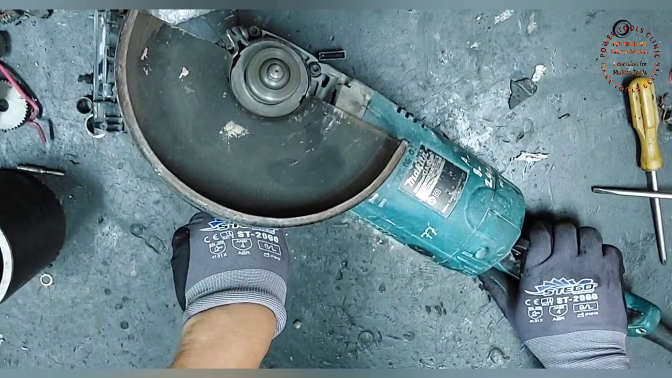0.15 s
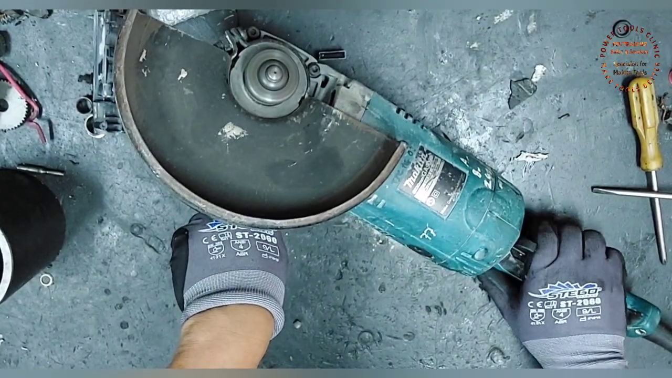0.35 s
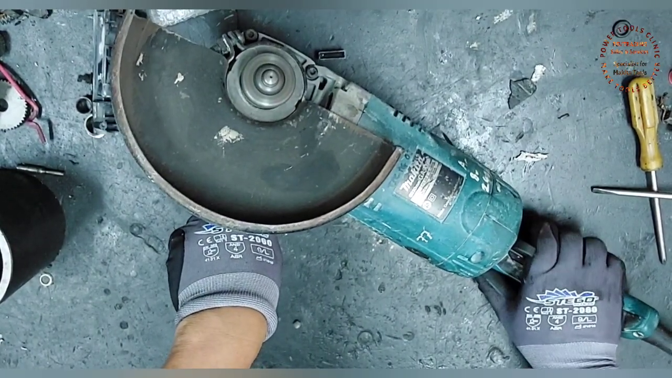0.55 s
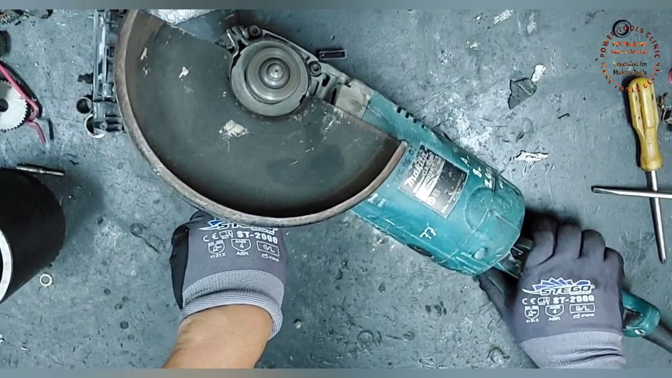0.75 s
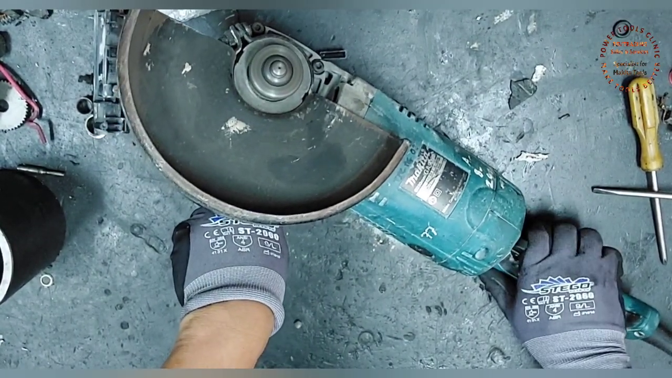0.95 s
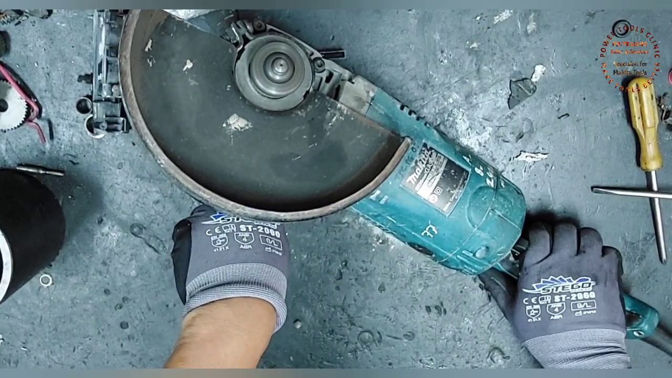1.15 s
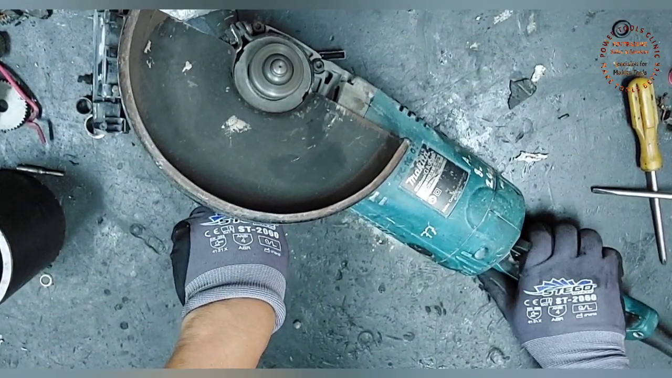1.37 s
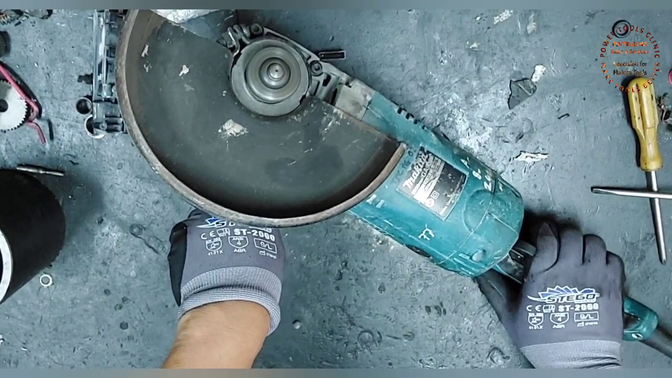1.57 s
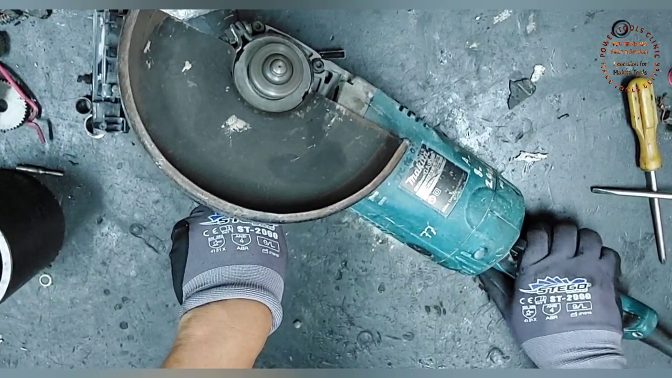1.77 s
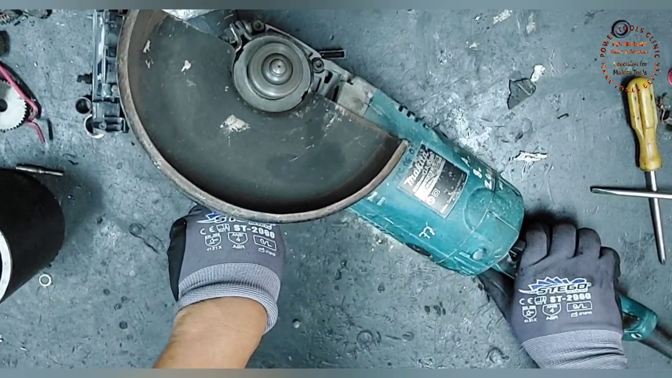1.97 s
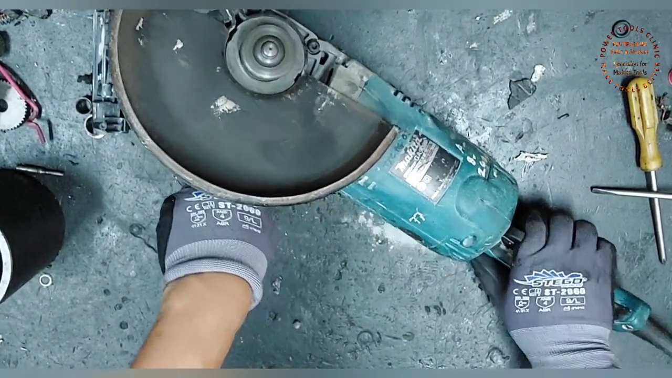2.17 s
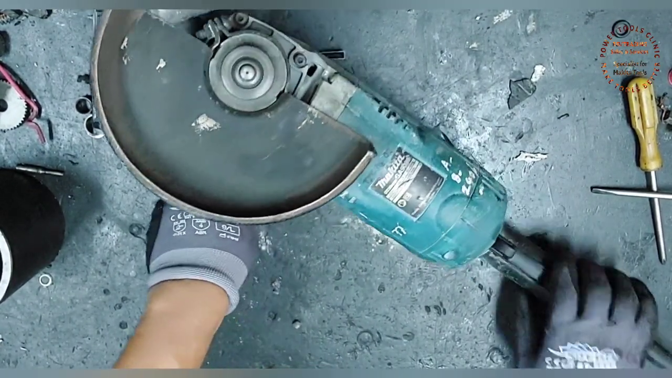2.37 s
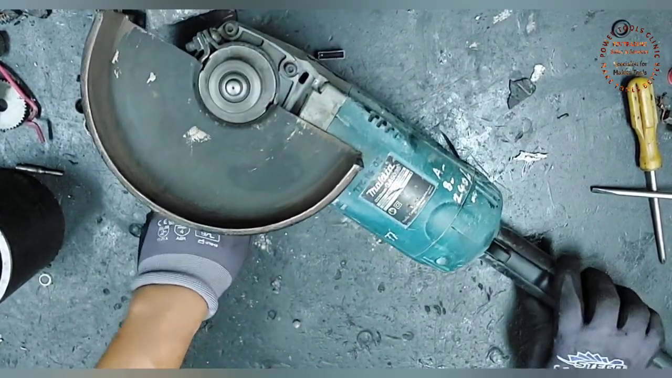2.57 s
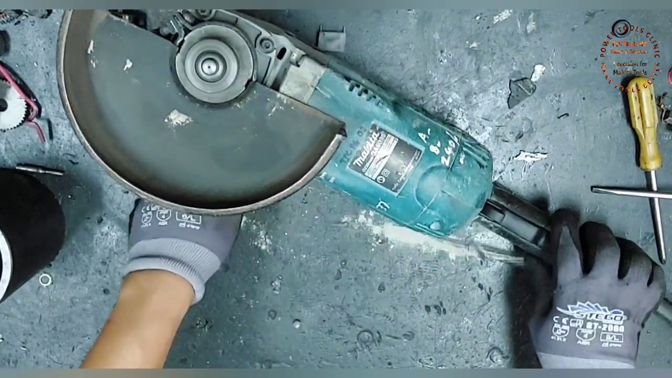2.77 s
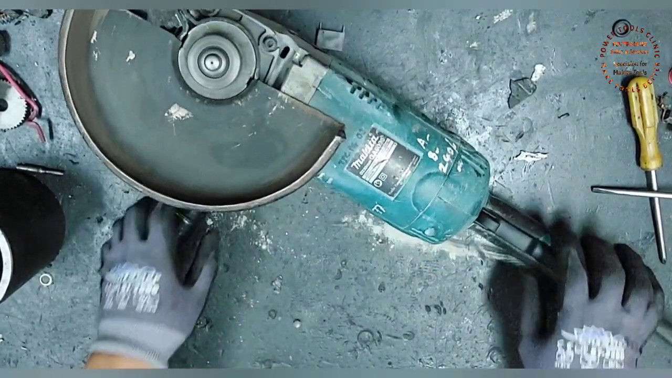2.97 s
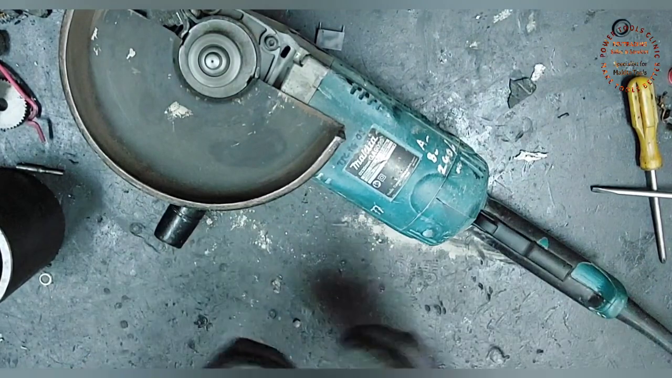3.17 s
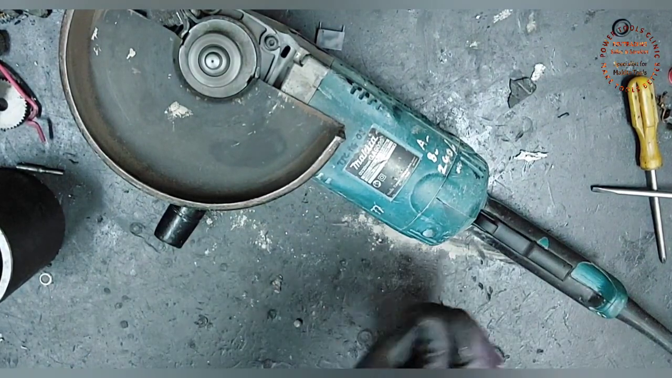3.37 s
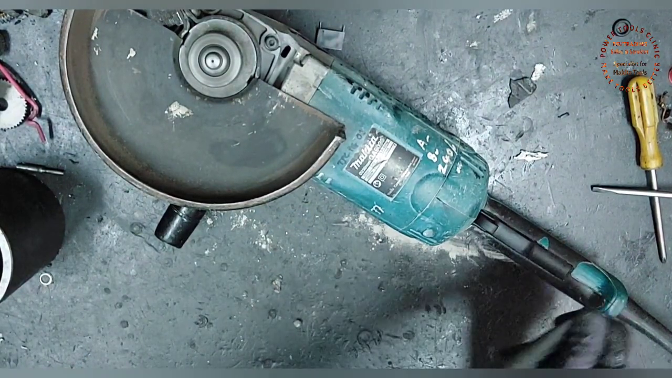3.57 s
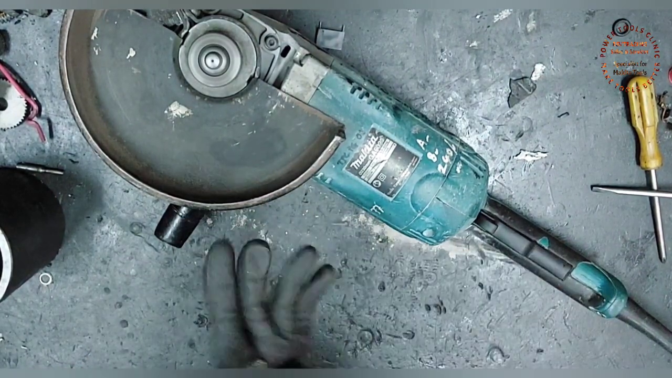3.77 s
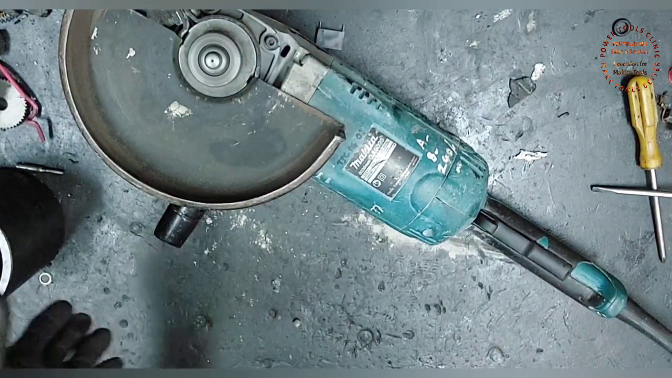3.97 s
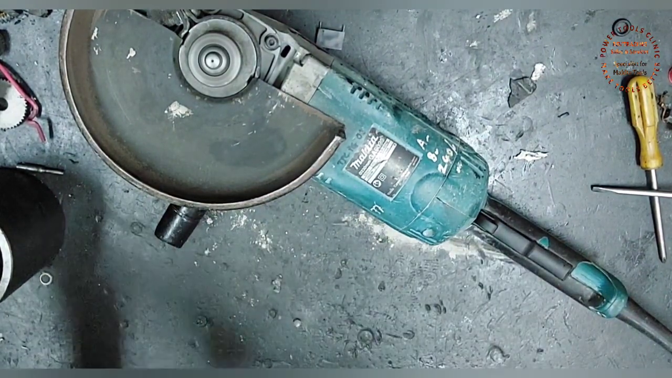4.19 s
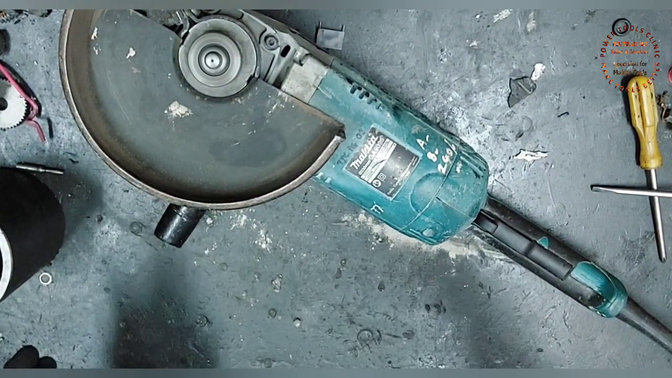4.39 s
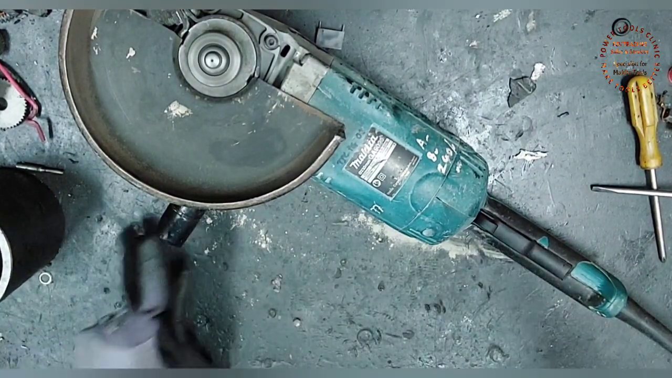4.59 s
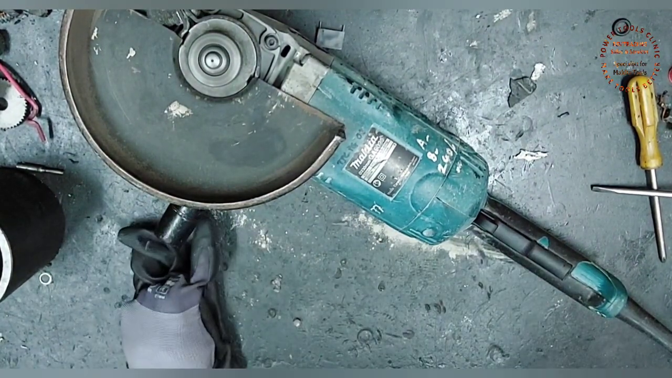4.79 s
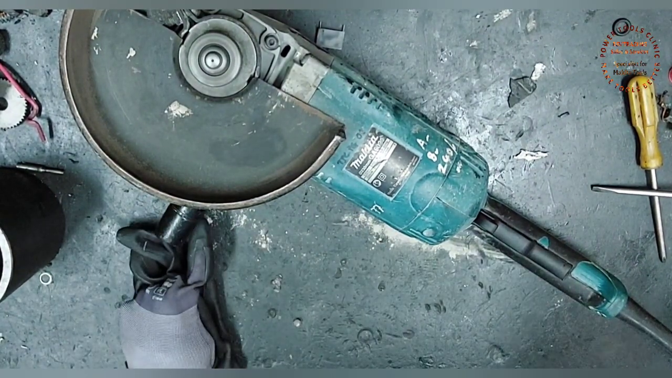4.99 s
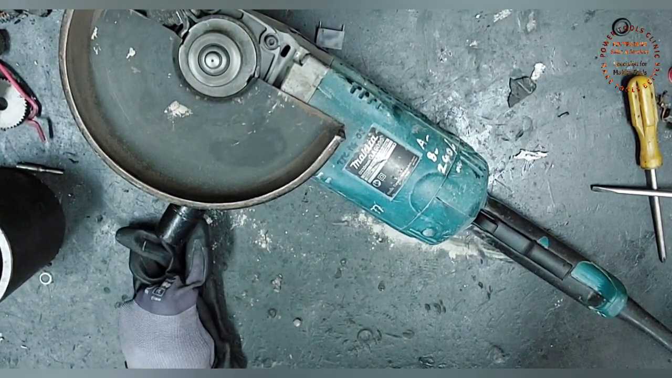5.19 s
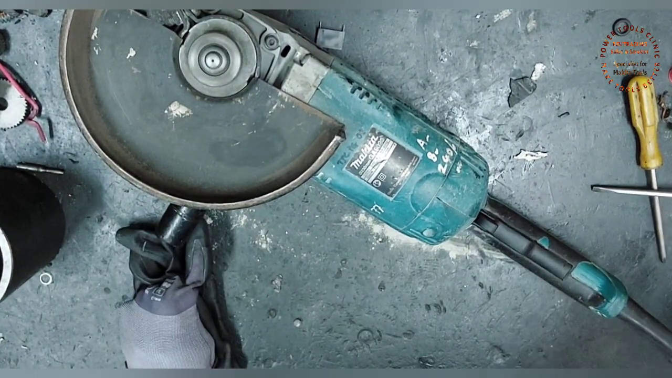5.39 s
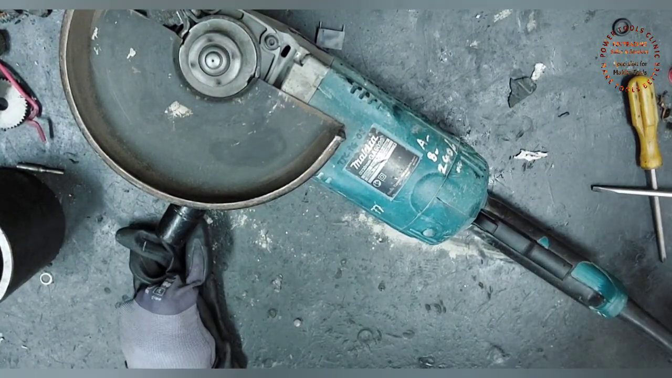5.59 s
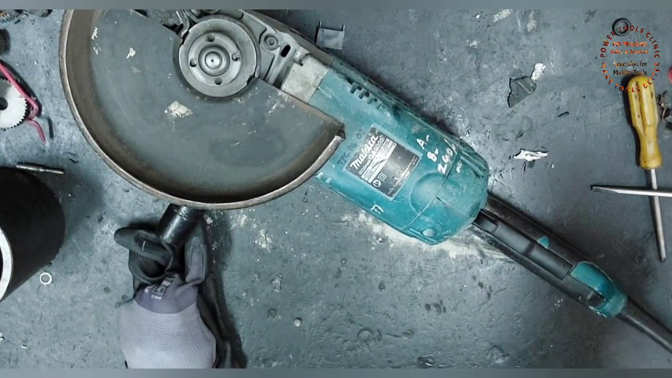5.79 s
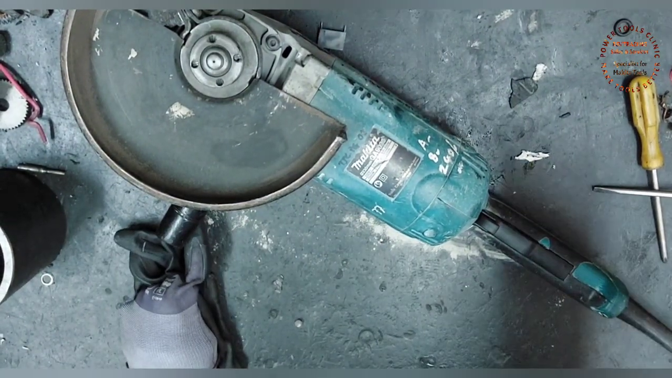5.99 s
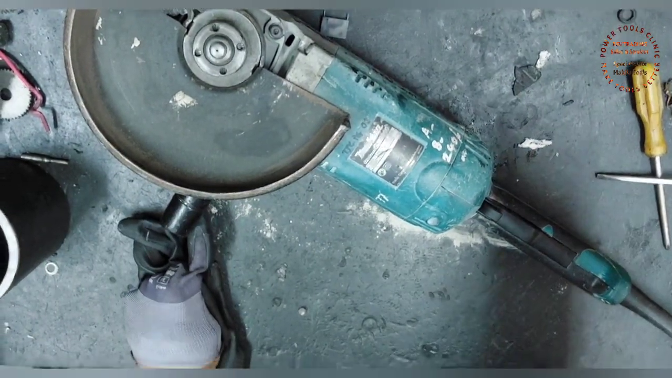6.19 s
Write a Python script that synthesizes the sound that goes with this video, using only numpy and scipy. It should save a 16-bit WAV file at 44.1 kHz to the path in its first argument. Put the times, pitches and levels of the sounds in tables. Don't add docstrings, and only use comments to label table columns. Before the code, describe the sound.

A large angle grinder with no disc is already running, close to a phone in a small-sounding workshop: loud, wide rushing fan air, a buzzing motor body and a thin high singing from the fan blades. At 0.4 s the trigger is released and the pitch sags; it surges back from 0.8 to 1.5 s, sags, and surges again from 1.8 to 2.2 s. Then it coasts. The roar briefly swells hollowly as the tool is lifted around 2.5 s, then thins, while a grainy, many-toned brush whine slides downward, flickering and throbbing. From 3.1 s loose gears clatter irregularly, strongest around 3.2 to 3.7 s, then weaker and sparser. The scraping becomes a low, slow rasp and ends with a small metallic click at 5.8 s. Quiet shop hum remains, with faint glove slides from 6.0 s and soft dull handle bumps from 6.1 to 6.2 s.

```python
import sys
import numpy as np
from scipy import signal
from scipy.fft import rfft, irfft
from scipy.io import wavfile
from scipy.ndimage import uniform_filter1d

SR = 44100
rng = np.random.default_rng(int(sys.argv[2]) if len(sys.argv) > 2 else 0)


def volts_from_decibels(level):
    exponent = np.asarray(level, float) / 20
    return 10 ** exponent


def store_wav(level_fs):
    pcm = np.round(np.clip(np.atleast_2d(level_fs), -1, 1) * 32767)
    wavfile.write(sys.argv[1], SR, pcm.T.astype(np.int16))


N = 275345
T = np.arange(N) / SR
HZ = np.maximum(np.arange(N // 2 + 1) * SR / N, 1)
TOP_HZ = 15700
BARS = 32


# (pressed [s], released [s])
TRIGGER = [
    (0, .405),
    (.813, 1.507),
    (1.815, 2.24),
]


def motor():
    start_turns_s, free_turns_s, spin_up_s = 415.2, 438.5, .263
    friction, bearing_drag, fan_drag = 72.3, .178, .00043
    slip_ease, slip_turns_s = 2.1, 82
    step_s = .001
    t = np.arange(0, T[-1] + step_s, step_s)
    power = 0
    for on, off in TRIGGER:
        power = power + np.clip((t - on) / step_s + 1, 0, 1) - np.clip((t - off) / step_s + 1, 0, 1)
    speed = [start_turns_s]
    for p in power[1:]:
        w = speed[-1]
        loss = friction + bearing_drag * w + fan_drag * w * w
        loss = loss - slip_ease / (1 + (w / slip_turns_s) ** 6)
        gain = (free_turns_s - w) / spin_up_s
        speed.append(max(w + step_s * (p * gain - (1 - p) * loss), 0))
    return np.interp(T, t, speed), np.interp(T, t, uniform_filter1d(power, size=120))


# (frequency [Hz], level [dB per Hz])
AIR = [(18, -63.5), (30, -35), (108, -18.5), (178, -21.5), (250, -10.5), (411, -2.5), (577, -10.5),
       (1140, -3.5), (1370, -6), (1690, -5), (2250, -3.5), (5770, -20), (10000, -17.5), (12000, -13.5),
       (15600, -27.5)]
# (frequency [Hz], width [Hz], level [dB])
VENTS = [(261, 47, 5.5), (425, 37, 5), (679, 45, 7), (826, 37, 4.5), (967, 55, 2.5), (1200, 66, 3),
         (1512, 99, 6.5), (2170, 66, 6.5), (2330, 64, 2), (3030, 780, 2.5), (3940, 890, 7),
         (6360, 130, 15.5)]
# (time [s], length [s], level [dB])
LIFT_SWELL = [
    (2.45, .3, 2),
]
# (time [s], length [s], level [dB])
CAVITY_SWELL = [
    (2.68, 0.42, 2.5),
]


def fan(speed, power):
    roar_db = -38 + 26 * decades(speed) + 1 * power + flares(LIFT_SWELL)
    slow_db = 20 * np.log10(speed / 420 + 0.0054)
    gust = walk(8.63)

    def band(hz):
        return roar_db + 0.51 * slow_db * np.log2(max(hz, 120) / 500) + .5 * gust + .5 * walk(14)

    roar = volts_from_decibels(7) * noise(colour(AIR, HZ, VENTS), volts_from_decibels(1.5 * rng.standard_normal(N)), band)
    lift_s, lift_lasts_s = 2.22, .2
    cavity_hz = np.interp(T, [lift_s, lift_s + lift_lasts_s], [1377, 1514])
    cavity_db = roar_db + 6 + 19.5 * decades(speed) + flares(CAVITY_SWELL) - 8.0
    return roar + room(hiss(cavity_hz, 50)[0] * volts_from_decibels(cavity_db), -3.5, 0.084)


# (frequency [Hz], level [dB per Hz])
HOUSING = [(35, -55.5), (60, -29.5), (112, -9), (179, -20.5), (260, -9.5), (434, -9), (522, -8.5),
           (934, -6), (1260, -5), (1790, -2), (2480, -4), (4870, -3), (6150, -7), (15600, -13)]
# (frequency [Hz], width [Hz], level [dB])
SHELL = [(115, 63, 8), (456, 75, 5), (946, 160, 5.5), (1480, 120, 3), (1830, 250, 5.5), (3630, 84, 0.5),
         (4370, 700, 1.5), (7380, 760, 3.5)]


def brushes(speed, turns):
    stall_turns_s, creep_turns_s = 22.2, 3.7
    stall = np.log10(np.hypot(speed, creep_turns_s) / np.hypot(speed, stall_turns_s))
    rub_db = -37.5 + 2.5 * decades(speed) + 33.5 * stall
    bar = (turns * BARS).astype(int)
    lump_db = 1.8 * rng.standard_normal(BARS)[bar % BARS]
    lump_db = lump_db + 1.8 * rng.standard_normal(bar[-1] + 1)[bar]
    grain = volts_from_decibels(uniform_filter1d(lump_db, size=90)) * (1 + .4 * np.sin(2 * np.pi * turns * BARS))
    tilt_db = 2.6 * np.log2(np.clip(speed, 20, 200) / 130)
    body_db = 3.9 * np.log2(np.clip(speed, 60, 180) / 115)
    hum_db = 6.5 / (1 + (2 * (speed - 150) / 120) ** 2)
    hum_db = hum_db - 3.5 + 12 * np.log10(np.clip(speed / 50, .05, 1))
    skim_db = -1 / (1 + (160 / (speed + 1)) ** 8)
    rub_db = rub_db + np.clip(1.5 - speed / 150, .6, 1.3) * walk(80)

    def band(hz):
        db = rub_db + tilt_db * np.log2(max(hz, 1500) / 2000)
        db = db + (200 < hz < 1200) * body_db + (hz < 200) * hum_db + (hz > 6000) * skim_db
        return db + 1.0 * walk(16)

    return noise(colour(HOUSING, HZ, SHELL), grain, band)


# (frequency [Hz], level [dB])
TICKS = [(600, -79.8), (1200, -66.8), (2000, -50.7), (3200, -57.9), (5000, -47.2), (7000, -54.3),
         (9000, -50.1), (15500, -46.1)]
# (frequency [Hz], width [Hz], level [dB])
CASING_RINGS = [(1500, 130, 8.2), (1800, 270, 11.4), (2180, 80, 4.7), (2320, 70, 5.1), (2830, 180, 9.7),
                (3360, 520, 13.1), (3780, 490, 11.2), (4330, 310, 6.5), (4910, 630, 9.6), (5380, 140, 4.8),
                (5750, 430, 8.1), (6620, 1030, 8.7), (7590, 670, 12.7), (8080, 210, 1.3)]
MULTIPLES = [6, 8, 9, 10, 11, 12, 13, 14, 16, 18, 19, 20, 21, 23, 24, 26, 27, 28, 29, 31, 32, 33, 34, 35,
             36, 37, 40, 44, 45, 47, 52, 56, 62, 64, 66, 68, 74, 96, 98, 128, 130]
MULTIPLE_DB = [1.0, -4.0, -6.0, -7.0, -11.0, -7.0, -12.0, -8.0, -9.0, -7.0, -12.0, -15.0, -11.0, -16.0,
               -9.0, -16.0, -14.0, -7.0, -14.0, -18.0, 0.0, -16.0, -9.0, -13.0, -14.0, -19.0, -14.0, -22.0,
               -18.0, -16.0, -20.0, -21.0, -21.0, -10.0, -13.0, -19.0, -28.0, -15.0, -19.0, -23.0, -24.0]
# (time [s], multiple, length [s], level [dB])
FLARES = [(2.7, 32, .25, -9), (2.72, 12, .05, 10), (2.76, 6, .06, 6), (2.76, 20, .05, 12),
          (2.78, 18, .08, -9), (2.86, 6, .08, -9), (2.86, 21, .12, 8), (2.92, 28, .08, 7),
          (3.05, 18, .12, -5), (3.08, 14, .12, 3), (3.16, 32, .1, -6), (3.27, 24, .08, 6),
          (3.28, 16, .12, -9), (3.3, 18, .14, 11), (3.31, 21, .08, 5), (3.43, 24, .06, 9),
          (3.52, 16, .1, 5), (3.53, 21, .09, 10), (3.52, 44, .08, 14), (3.55, 26, .1, 8),
          (3.57, 14, .1, 10), (3.62, 24, .06, 5), (3.64, 47, .12, 10), (3.72, 19, .06, 8),
          (3.73, 29, .06, 11), (3.73, 27, .06, 8), (3.74, 16, .14, -9), (3.75, 32, .1, 3),
          (3.78, 36, .04, 12), (3.84, 34, .08, 3), (3.86, 18, .12, -9), (3.97, 32, .12, 3),
          (4.0, 23, .05, 10), (4.02, 36, .12, 9), (4.14, 40, .12, 7), (4.16, 14, .12, -9),
          (4.26, 98, .12, 10), (4.28, 28, .08, 4), (4.34, 34, .14, -9), (4.36, 32, .12, 3),
          (4.36, 16, .12, 5), (4.65, 32, .14, 7), (4.65, 64, .25, -8), (4.88, 66, .14, 6),
          (5.02, 64, .12, -3), (5.23, 96, .06, -4), (5.02, 32, .2, 7), (5.22, 130, .2, -5),
          (5.22, 32, .1, 8), (5.27, 64, .25, 7), (5.36, 62, .08, 14), (5.5, 98, .08, 6)]


def whine(speed, turns):
    drop_in_turns_s = 69
    skim_turns_s = 275
    slow = 1 / (1 + (speed / drop_in_turns_s) ** 4)
    drift, flicker, wobble = walk(20), walk(60), walk(70)
    chance = rng.random((len(MULTIPLES), 3))
    out = 0
    for k, strength_db, (shift, beat, start) in zip(MULTIPLES, MULTIPLE_DB, chance):
        hz = k * speed + 1
        own_drift, own_flicker, own_wobble = [np.roll(v, int(shift * N)) for v in (drift, flicker, wobble)]
        flutter_db = (.8 - .06 * strength_db) * own_drift + (1.6 - .08 * strength_db) * own_flicker
        db = strength_db + 3 * slow * np.sin(2 * np.pi * (turns + beat))
        db = db + flares([(s, length_s, g) for s, m, length_s, g in FLARES if m == k])
        gain = volts_from_decibels(db + colour(TICKS, hz, CASING_RINGS) + flutter_db) * (hz < TOP_HZ)
        blur = .003 * max(k, BARS) * (1 + slow) * own_wobble
        out = out + gain * np.sin(2 * np.pi * (k * turns + blur + start))
    skim_db = -70 * np.log10(np.maximum(speed / skim_turns_s, 1))
    return out * volts_from_decibels(-0.5 + 2.3 * slow + skim_db)


# (frequency [Hz], width [Hz], level [dB])
VENT_RINGS = [(10200, 430, -7.5), (11030, 300, 6.5), (11800, 250, 4), (12460, 300, 7)]
# (time [s], length [s], level [dB])
BLADE_FLARES = [(.15, 0.19, -3.5), (.35, .12, 3), (.7, .08, 5), (.95, .08, 1.5), (1.12, .1, 5),
                (1.42, .12, 1.5), (1.68, .12, -3), (1.9, .12, -6), (2.06, .1, 2), (2.24, .15, -5),
                (2.46, .08, 4.5)]


def blades(speed, turns):
    count = 29
    rings_db = colour([(1, 0), (SR, 0)], count * speed + 1, VENT_RINGS)
    slow_db = 140 * np.log10(np.clip(speed / 385, .001, 1))
    return tone(count * turns, -53.5 + flares(BLADE_FLARES) + rings_db + slow_db, .12, 2.0)


def shake(speed, turns):
    db = -49.5 + 12 / (1 + ((speed - 320) / 28) ** 2)
    db = db - 23 / (1 + (speed / 260) ** 12)
    return tone(turns, db + 15 * decades(speed), 0.042, 1.5)


# (time [s], level [dB])
BACKLASH = [(3.1099, -36), (3.1465, -30), (3.175, -23), (3.219, -29), (3.3827, -26), (3.467, -25),
            (3.5234, -27), (3.5538, -28), (3.597, -22), (3.638, -23), (3.7294, -33), (3.8003, -34),
            (3.922, -28), (3.9864, -36), (4.0143, -37), (4.0552, -30), (4.2952, -39), (4.4039, -27),
            (4.45, -31), (4.5187, -31), (4.589, -31), (4.6548, -32), (4.7052, -34), (4.7511, -49),
            (4.842, -35.5), (4.8918, -37), (4.9601, -35), (5.0923, -44), (5.2141, -32), (5.2999, -29),
            (5.3567, -34), (5.3922, -41), (5.4411, -38), (5.474, -44), (5.5478, -45), (5.6167, -52)]


def gears():
    s, db = np.transpose(BACKLASH)
    hits = np.zeros(N)
    hits[(s * SR).astype(int)] = volts_from_decibels(db - 9)
    t = T[:int(.06 * SR)]
    swell = signal.fftconvolve(hits, (1 - np.exp(-t / 0.00083)) * np.exp(-t / 0.0078))[:N]
    ring = hiss(np.full(N, 1850.), 240)[0]
    thud = volts_from_decibels(-6) * hiss(np.full(N, 650.), 390)[0]
    clack = volts_from_decibels(-6) * hiss(np.full(N, 3600.), 1300)[0]
    return room(swell * (ring + thud + clack), -5, .08)


# (frequency [Hz], level [dB], time to fall 60 dB [s])
STOP_MODES = [(1030, 1, 0.018), (1370, 3, .02), (1670, -1, .02), (2140, 4.5, 0.02), (2870, -9, .015),
              (4130, -14, .012), (4930, -10, .012)]


def stop_click():
    stop_s, stop_db = 5.799, -51
    t = np.maximum(T - stop_s, 0)
    ring = 0
    for hz, db, t60_s in STOP_MODES:
        ring = ring + volts_from_decibels(db) * np.sin(2 * np.pi * hz * t) * np.exp(-np.log(1000) * t / t60_s)
    crack = uniform_filter1d(uniform_filter1d(rng.standard_normal(N), size=6), size=5)
    crack = crack * np.exp(-t / 0.005) * 1.5
    return room(volts_from_decibels(stop_db - 4.0) * (ring + crack) * (1 - np.exp(-t / .0012)), -2, 0.13)


# (time [s], level [dB], frequency [Hz], left minus right [dB])
BUMPS = [
    (6.107, -54, 293, 8),
    (6.149, -60.5, 315, -2.0),
    (6.166, -60.5, 320, 6.5),
    (6.221, -54, 320, 7),
]


def handle_bumps():
    out = 0
    for s, db, hz, pan_db in BUMPS:
        t = np.maximum(T - s, 0)
        sides_db = db + np.array([[pan_db], [-pan_db]]) / 2
        out = out + volts_from_decibels(sides_db) * np.sin(2 * np.pi * hz * t) * np.exp(-t / 0.0025)
    return out


# (loudest time [s], rise and fall per 10 dB [s], hiss level [dB], centre [Hz], rasp level [dB])
SLIDES = [
    (6.015, .025, -81, 9000, -96),
    (6.062, .035, -78, 11500, -92),
    (6.168, .045, -75, 13420, -75),
]


def glove():
    out = 0
    for s, fall_s, hiss_db, hz, rasp_db in SLIDES:
        swell_db = -10 * np.abs(T - s) / fall_s + 1.6 * walk(120)
        out = out + hiss(np.full(N, hz), 1800) * volts_from_decibels(hiss_db + swell_db)
        rasp = hiss(np.full(N, 2000.), 500) + hiss(np.full(N, 4400.), 1200)
        out = out + rasp * volts_from_decibels(-3 + rasp_db + 1.4 * swell_db)
    return out


# (frequency [Hz], level [dB per Hz])
SHOP = [(15, -38), (25, -9), (115, 2.5), (185, -13.5), (282, 1), (379, -11), (411, -13), (524, -12.5),
        (1270, -28), (2400, -39), (15600, -46)]


def shop():
    return noise(colour(SHOP, HZ), 1, lambda hz: -71 + 1.9 * walk(2.4))


def decades(speed):
    return np.log10(np.maximum(speed, .5) / 420)


def flares(rows):
    return sum(db * np.exp(-2 * ((T - s) / length_s) ** 2) for s, length_s, db in rows)


def colour(table, hz, peaks=()):
    f, db = np.transpose(table)
    rings_db = sum(g / (1 + (2 * (hz - c) / w) ** 2) for c, w, g in peaks)
    return np.interp(np.log(hz), np.log(f), db) + rings_db


def walk(rate):
    k = int(SR / rate)
    steps = np.repeat(rng.standard_normal(N // k + 1), k)
    return 1.37 * uniform_filter1d(uniform_filter1d(steps, k), k)[:N]


def tone(turns, db, wobble, flutter_db):
    gain = np.sqrt(2) * volts_from_decibels(db + flutter_db * walk(15))
    return gain * np.sin(2 * np.pi * (turns + wobble * walk(35)))


def hiss(hz, half_width_hz):
    sos = signal.butter(2, half_width_hz, fs=SR, output="sos")
    low = signal.sosfilt(sos, rng.standard_normal((4, N)))
    phase = 2 * np.pi * np.cumsum(hz) / SR
    band = low[:2] * np.sin(phase) + low[2:] * np.cos(phase)
    return band / np.sqrt(np.mean(band ** 2))


# (frequency [Hz], side minus mid [dB])
WIDTH = [(60, -2.5), (110, -12.5), (200, -9), (380, -14.5), (700, -5), (1290, -6), (2380, -4), (4400, 0),
         (8120, 1.5), (15000, -1)]
# (frequency [Hz], left minus right [dB])
TILT = [(60, 1.5), (110, 2), (200, 2), (380, -1.5), (700, 0), (1290, 2), (2380, 1.5), (4400, 0), (8120, 2),
        (15000, -3.5)]


def noise(shape_db, grain, band_db):
    mid, side = rfft(rng.standard_normal((2, N)) * grain) * volts_from_decibels(shape_db)
    side = side * volts_from_decibels(colour(WIDTH, HZ))
    tilt = volts_from_decibels(colour(TILT, HZ) / 2)
    pair = np.array([(mid + side) * tilt, (mid - side) / tilt])
    pair = pair / np.sqrt(np.mean(irfft(mid, N) ** 2))
    out = 0
    for hz in 30 * 2. ** np.arange(10):
        share = np.cos(np.pi / 2 * np.clip(np.log2(HZ / hz), -1, 1)) ** 2
        out = out + irfft(pair * share, N) * volts_from_decibels(band_db(hz))
    return out


def room(x, wet_db, t60_s):
    t = np.arange(int(.3 * SR)) / SR
    tail = rng.standard_normal((2, len(t))) * np.exp(-np.log(1000) * t / t60_s) * (t > .002)
    tail = tail * volts_from_decibels(wet_db) / np.sqrt(np.sum(tail ** 2, axis=1, keepdims=True))
    return x + signal.fftconvolve(x * np.ones((2, 1)), tail, axes=1)[:, :N]


def scene():
    speed, power = motor()
    turns = np.cumsum(speed) / SR
    lines = whine(speed, turns) + blades(speed, turns)
    grinder = fan(speed, power) + brushes(speed, turns) + gears()
    grinder = grinder + room(lines, -4.5, 0.06) + room(shake(speed, turns), -15.5, 0.092)
    pan_db = -1.03
    at_rest = np.clip((5.82 - T) / 0.063, 0, 1)
    grinder = grinder * volts_from_decibels(np.array([[pan_db], [-pan_db]]) / 2) * at_rest
    return grinder + stop_click() + handle_bumps() + glove() + shop()


def band_limit(x):
    return signal.sosfilt(signal.butter(12, 17090, fs=SR, output="sos"), x)


def record(dry):
    ripple_period, ripple_peak = 1024, 850
    ripple = 1 + .11 * np.cos(2 * np.pi * (np.arange(N) - ripple_peak) / ripple_period)
    top = signal.ellip(12, .5, 90, TOP_HZ, fs=SR, output="sos")
    mix = signal.sosfilt(top, dry * ripple)
    return band_limit(mix)


dry = scene()
out = record(dry)
store_wav(out)
```